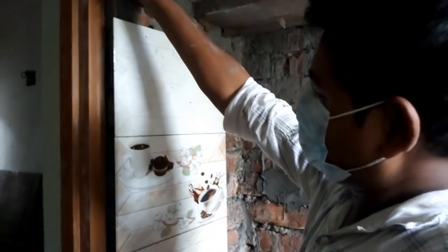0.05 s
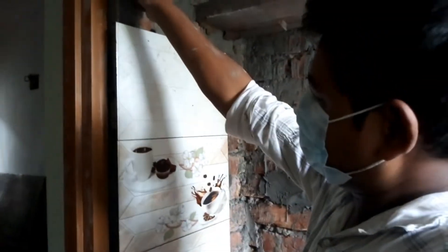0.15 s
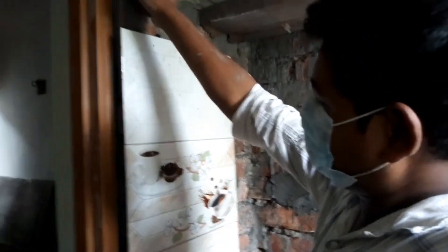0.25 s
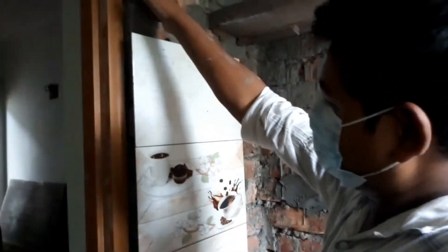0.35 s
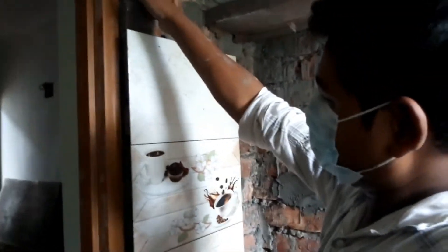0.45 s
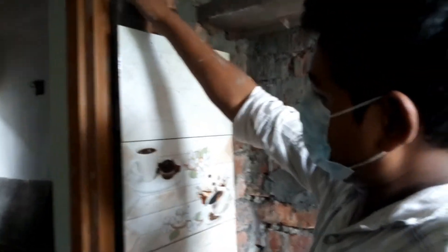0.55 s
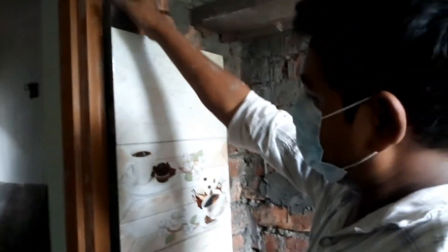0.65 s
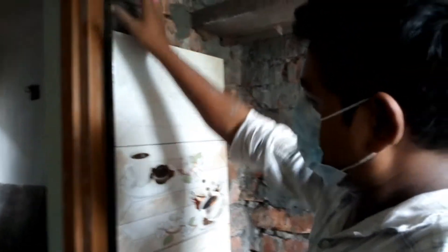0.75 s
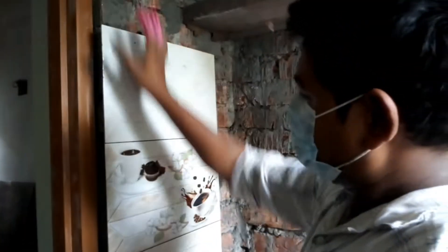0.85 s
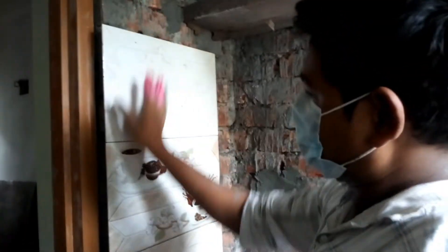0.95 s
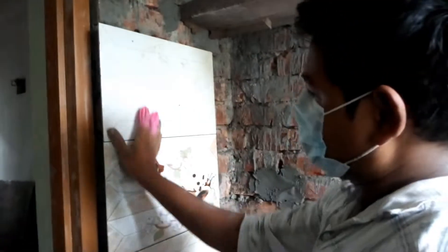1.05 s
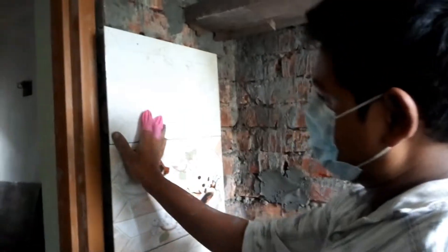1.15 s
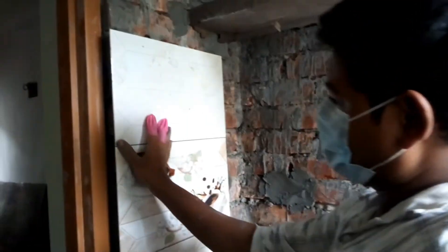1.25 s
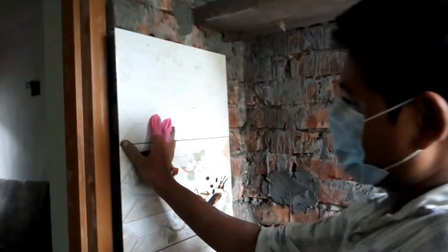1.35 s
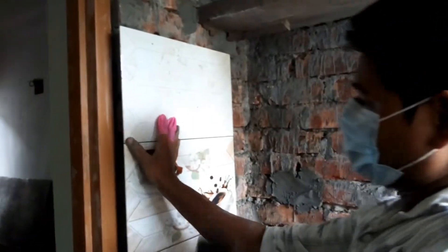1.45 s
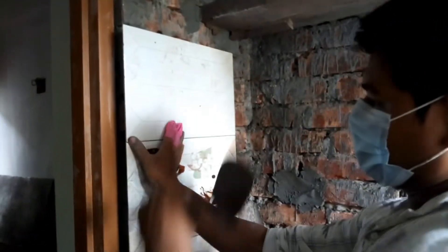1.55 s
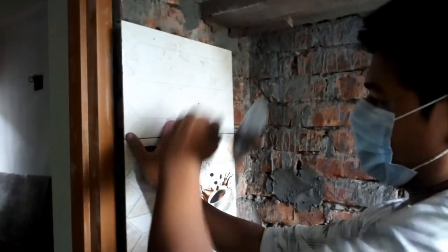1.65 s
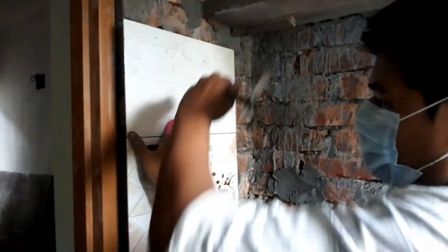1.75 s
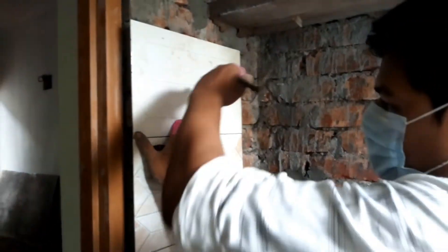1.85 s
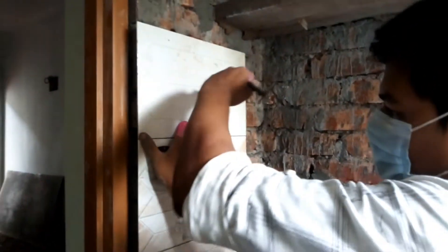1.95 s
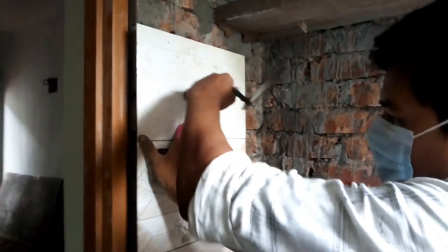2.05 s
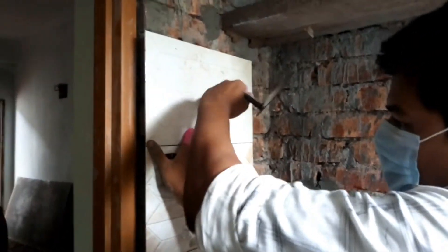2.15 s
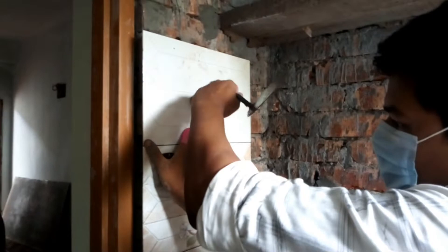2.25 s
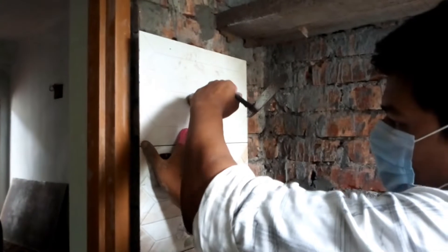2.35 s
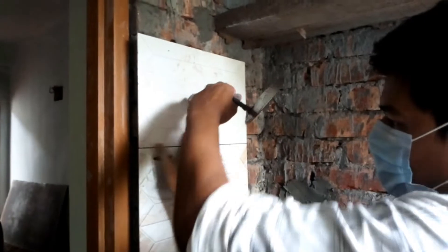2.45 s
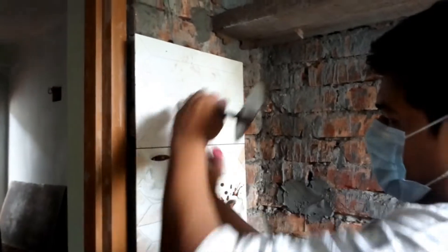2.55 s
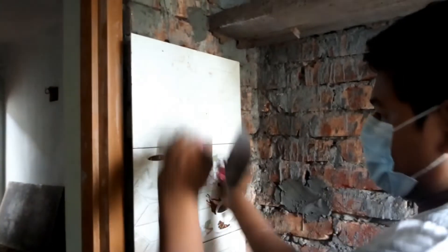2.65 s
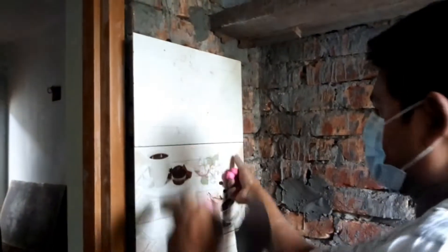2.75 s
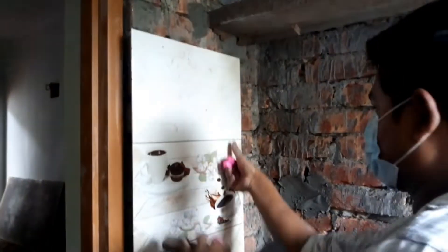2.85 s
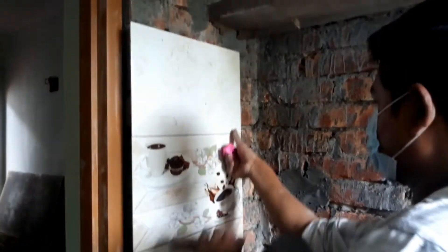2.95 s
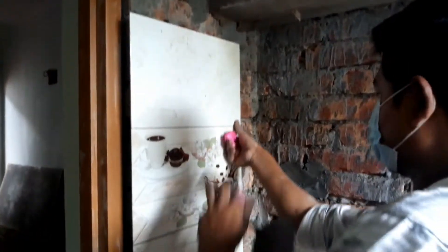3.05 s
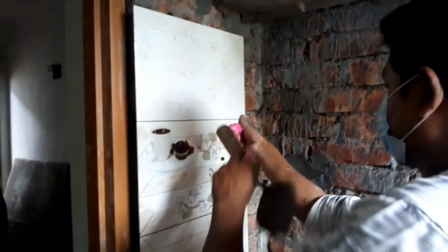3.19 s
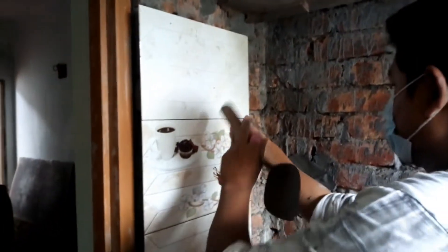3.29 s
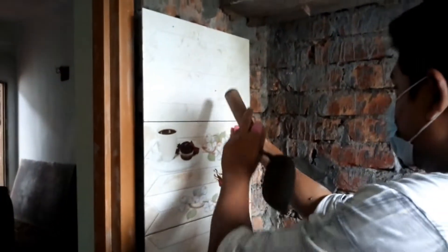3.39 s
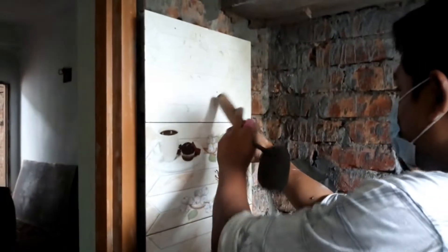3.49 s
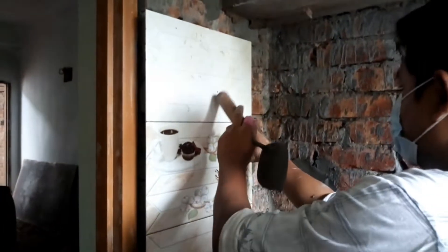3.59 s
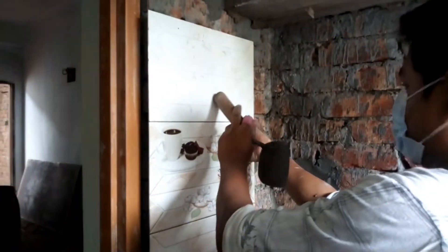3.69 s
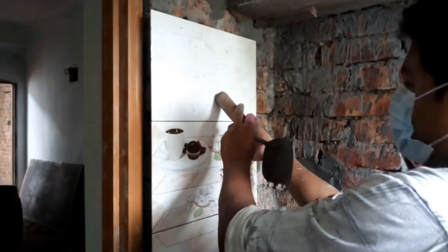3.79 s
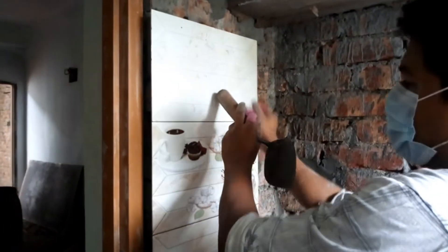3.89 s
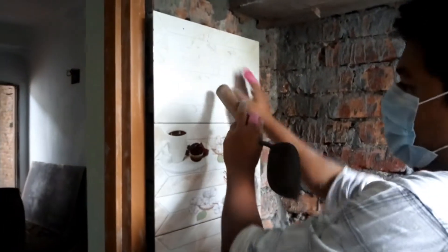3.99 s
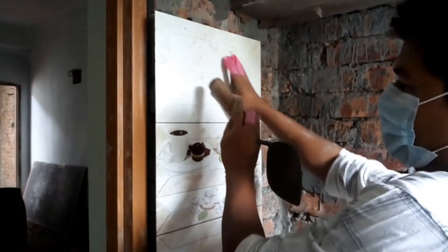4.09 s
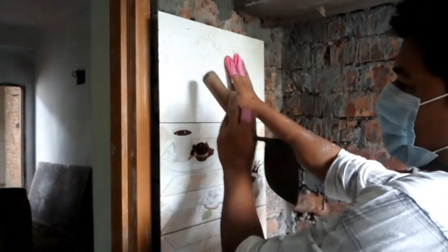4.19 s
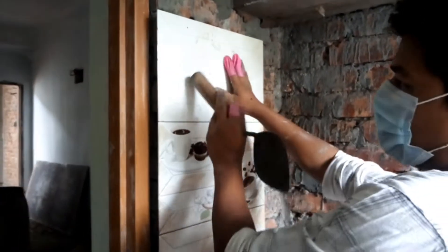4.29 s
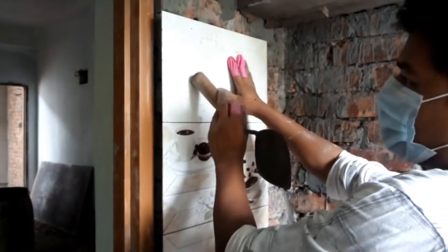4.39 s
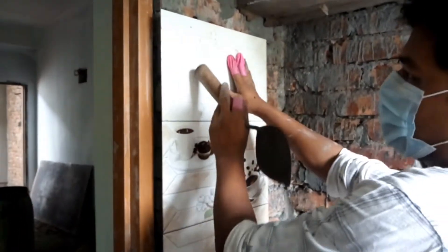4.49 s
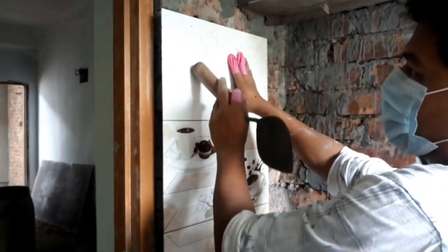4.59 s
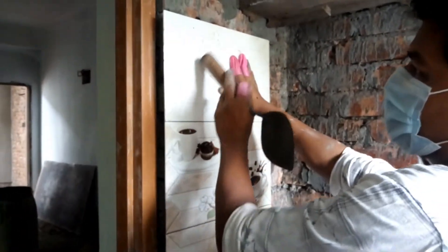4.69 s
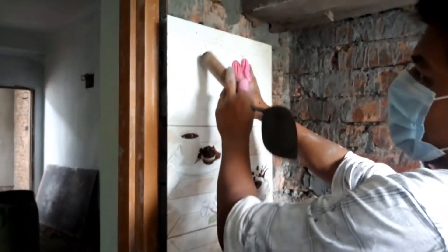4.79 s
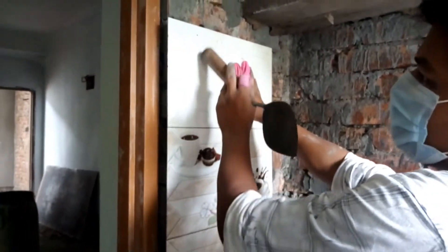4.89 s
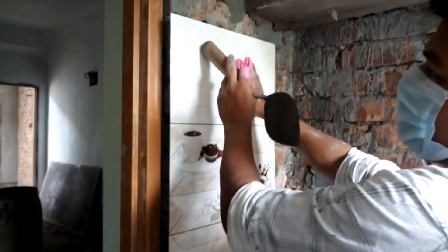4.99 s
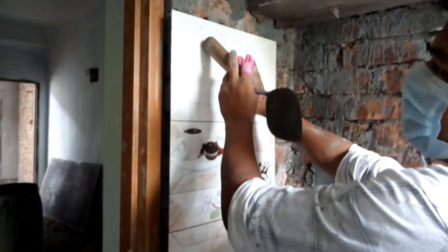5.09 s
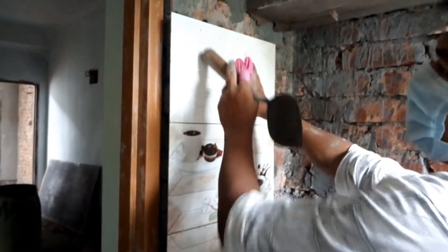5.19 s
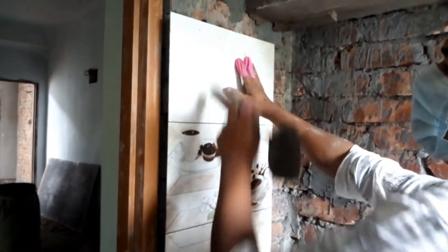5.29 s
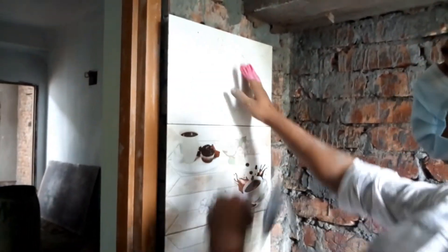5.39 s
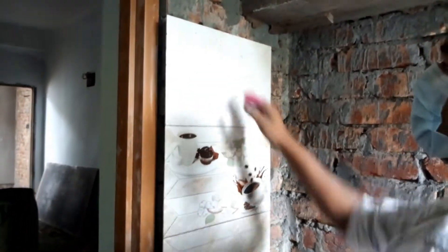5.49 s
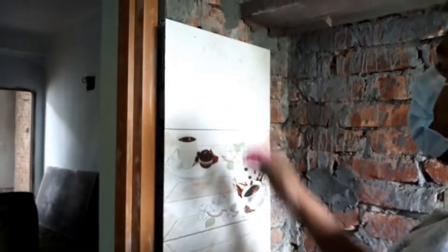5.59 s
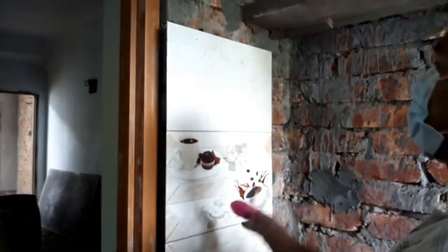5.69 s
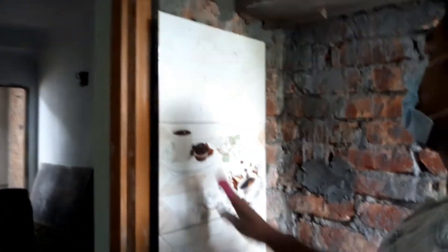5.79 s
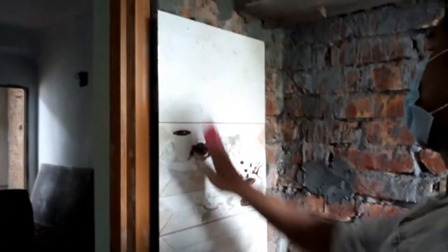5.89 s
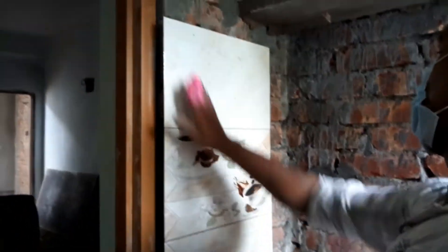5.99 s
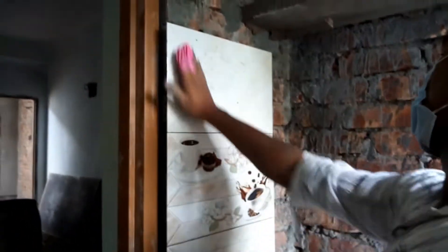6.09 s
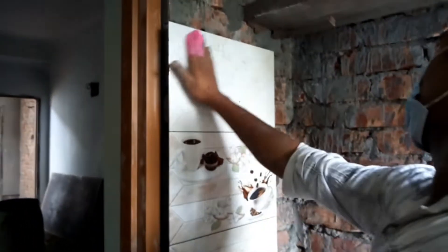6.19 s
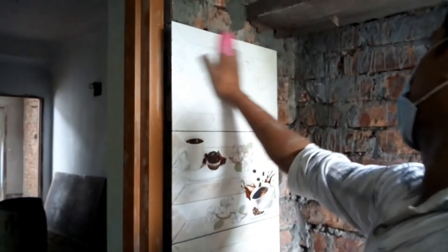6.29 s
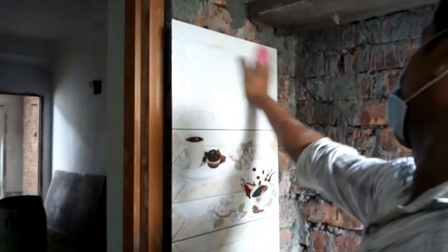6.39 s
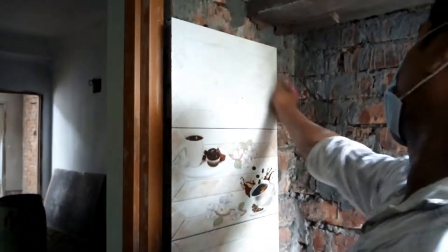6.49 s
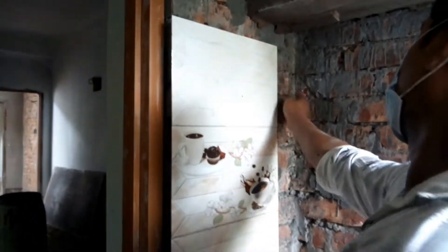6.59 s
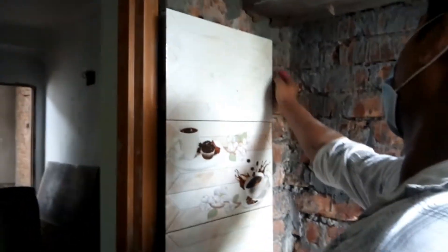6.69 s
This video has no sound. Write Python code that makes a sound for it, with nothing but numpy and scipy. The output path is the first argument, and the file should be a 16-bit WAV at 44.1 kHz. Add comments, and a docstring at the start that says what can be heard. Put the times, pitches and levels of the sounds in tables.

```python
"""A wooden tool handle knocks on ceramic tiles freshly set on the wall of a small bare brick room.
Each blow is a low-passed click that excites damped tile modes, and the hard room carries the hollow tock on
through its own modes and a dense noise tail. Thin squeaky scrapes are noise in gliding resonances.
A hand sliding over the glaze and a rustling sleeve are grainy coloured noise, grit ticks are puffs of band noise,
and a thin piece of metal rings once. Hiss, low hum and far-off scraping lie below as shaped noise."""
import sys
import numpy as np
from scipy import signal
from scipy.fft import rfft, irfft
from scipy.io import wavfile

SR = 44100
rng = np.random.default_rng(int(sys.argv[2]) if len(sys.argv) > 2 else 0)


def pcm_store(signal):
    """Save signal as 16-bit PCM."""
    levels = np.round(np.clip(np.atleast_2d(signal), -1, 1) * 32767)
    wavfile.write(sys.argv[1], SR, levels.astype(np.int16).T)


def magnitude_from_level(level_db):
    """Linear magnitude for a level in decibels (20 dB per decade)."""
    exponent = np.asarray(level_db, float) / 20
    return 10 ** exponent


N = 297234
TIME = np.arange(N) / SR   # s


# Blows of the handle. Each row: start in seconds, drive level in dB, hardness from 0 to 1,
# pitch of the wall's thump at that spot in Hz, room share in dB.
BLOWS = [(2.058, -10, 0.77, 260, 1.5), (2.25, -12, 0.87, 288, 4), (3.57, -25, 0, 318, -2.5),
         (3.699, -10, 0.7, 320, -3.5), (4.371, -16, 0.11, 160, -6), (4.572, -10, 0.69, 168, -4.5),
         (4.844, -10.5, 0.63, 211, -5.5), (5.008, -10.5, 0.73, 183, -4.5)]


def blows(tile_db=7):
    """Impact excitation: a harder contact is shorter, so its low-pass edge lies higher."""
    size = SR
    out = np.zeros(N + size)
    click = np.zeros(size)
    click[0] = 1
    tock = tile_tock(click)
    rings = room_rings(click)
    for start, level_db, hardness, spot_hz, room_db in BLOWS:
        room = wall_thump(room_response(rings, room_db), spot_hz, room_db)
        edge_hz = 700 * 2 ** (1.957 * np.clip(hardness, 0, 1.2))
        contact = signal.butter(4, edge_hz, fs=SR, output="sos")
        blow = signal.sosfilt(contact, magnitude_from_level(tile_db) * tock + magnitude_from_level(room_db) * room)
        at = round(start * SR)
        out[at:at + size] += magnitude_from_level(level_db) * blow
    return signal.sosfilt(signal.butter(1, 60, "high", fs=SR, output="sos"), out[:N])


# Modes of the bedded tile, damped by mortar. Each row: frequency in Hz, level in dB, t60 in seconds.
TILE_MODES = [(599, -6, 0.036), (743, 2, 0.013), (907, -7.5, 0.014), (1290, 1, 0.0053), (1800, -9, 0.0098),
              (2350, -16, 0.02), (4730, -19, .08), (6200, -7.5, 0.0648)]
# First strong returns from the walls. Each row: delay in seconds, level in dB.
WALL_ECHOES = [(.0125, -8), (.04, -11)]


def tile_tock(click, bend_s=0.00064, cut_hz=500):
    """Modal synthesis of a plate: damped sines sum to the tock, and a small plate radiates no bass."""
    t = np.arange(len(click)) / SR
    tock = -sum(magnitude_from_level(db) * ring(click, hz, t60) for hz, db, t60 in TILE_MODES)
    tock *= 1 - np.exp(-(t / bend_s) ** 2)   # the plate needs a cycle or two to swing fully
    tock = signal.sosfilt(signal.butter(4, cut_hz, "high", fs=SR, output="sos"), tock)
    return tock + sum(magnitude_from_level(db) * np.roll(tock, round(lag * SR)) for lag, db in WALL_ECHOES)


def wall_thump(room, spot_hz, room_db, split_hz=420, swell_s=0.0021):
    """Driven resonance: the wall answers most near the spot's own pitch; a solid bed damps it sooner."""
    body_db, peak_db, peak_q = -3, 0, 2.2   # broad lows, the spot's resonance and its sharpness
    t = np.arange(len(room)) / SR
    lows = signal.sosfilt(signal.butter(2, split_hz, fs=SR, output="sos"), room)
    highs = signal.sosfilt(signal.butter(2, split_hz, "high", fs=SR, output="sos"), room)
    drum = signal.lfilter(*signal.iirpeak(spot_hz, peak_q, fs=SR), lows)
    thump = magnitude_from_level(body_db) * lows + magnitude_from_level(peak_db) * drum
    thump *= 1 - np.exp(-(t / swell_s) ** 2)   # the wall takes a moment to move
    fading_db_per_s = -2 - 3.13 * room_db   # negative on hollow spots, where the thump lingers
    return magnitude_from_level(-0.04 * room_db - fading_db_per_s * t) * thump - highs


# Long-lived modes of wall and room. Each row: frequency in Hz, level in dB, t60 in seconds.
ROOM_MODES = [(115.6, -7.5, 0.79), (165.05, -5.5, 0.61), (206.4, -17.5, 0.98), (242.9, -6, 0.66),
              (265.6, -14.5, 0.86), (289.3, -13.5, 0.67), (328.4, -9.5, 0.34), (370.5, -10.5, 0.3),
              (469.5, -12.5, 0.52), (534, -4.5, 0.33), (625, -13.5, 0.46), (795, -18, 0.19),
              (831, -4, 0.33), (1045, -10, 0.21), (1103, -5, 0.51), (1127, -19.5, 0.15),
              (1376, -11.5, 0.24), (1535, -17, 0.26), (1824, -11, 0.25), (2090, -13, 0.31),
              (2466, -19.5, 0.08), (2624, -13, 0.36), (3200, -4, 0.19), (3990, -11.5, 0.17),
              (4620, -5, 0.17)]


def room_rings(click):
    """Standing waves: each mode rings as a damped sine and takes a few trips to form."""
    rings = np.array([magnitude_from_level(db) * ring(click, hz, t60) for hz, db, t60 in ROOM_MODES])
    return rings * (1 - np.exp(-np.arange(len(click)) / SR / 0.02))


def room_response(rings, room_db, tail_db=-7, modes_db=-7, ring_per_share=0.36):
    """Superposition of modes and diffuse field: each blow draws its own; hollow spots ring clearer."""
    size = rings.shape[1]
    strengths = magnitude_from_level(2 * rng.standard_normal(len(rings))) * rng.choice([-1, 1], len(rings))
    # close neighbours make each mode waver
    beating = magnitude_from_level(4 * np.array([drift(25)[:size] for _ in rings]))
    modes = strengths @ (beating * rings)
    return magnitude_from_level(tail_db) * diffuse_tail(size) + magnitude_from_level(modes_db + ring_per_share * room_db) * modes


# Colour of the reflections. Each row: frequency in Hz, relative level in dB per Hz.
ROOM_COLOUR = [(45, -3.5), (90, -6), (130, -1), (300, -3), (430, -4), (600, -2), (1000, -5.5), (2000, -10),
               (3350, -9), (3600, -16), (4500, -5), (5200, -48)]
# Decay of the reflections. Each row: frequency in Hz, t60 in seconds.
ROOM_T60 = [(80, 0.94), (220, 0.86), (560, 0.59), (1200, 0.57), (1600, 0.44), (3500, 0.36), (7000, .3)]


def diffuse_tail(size, build_s=0.00035, hump_db=5.0, hump_q=35):
    """Diffuse-field decay: third-octave noise builds up, lows later, and each band dies at its own rate."""
    # the modes colour the reflections unevenly
    humps = [(hz, hz / hump_q, hump_db * rng.uniform(0.29, 1.26)) for hz, _, _ in ROOM_MODES]
    t = np.arange(size) / SR
    edges = 45 * 2 ** np.arange(0, 7.2, 1 / 3)   # Hz
    noise = [coloured(ROOM_COLOUR, humps, size=size) for _ in range(2)]
    out = 0
    for k, (low, high) in enumerate(zip(edges, edges[1:])):
        hz = np.sqrt(low * high)
        band_pass = signal.butter(2, [low, high], "band", fs=SR, output="sos")
        band = signal.sosfilt(band_pass, noise[k % 2])   # neighbouring bands use separate noises
        rise = 1 - np.exp(-(t / (build_s + 3.2 / hz)) ** 2)
        out = out + band * rise * magnitude_from_level(-60 * t / at_hz(ROOM_T60, hz))
    return out


# Thin squeaky scrapes. Each row: start in seconds, length in seconds, first pitch in Hz, last pitch in Hz,
# level in dB before flutter and room.
SQUEAKS = [(0, 0.089, 2530, 2476, -59), (0.199, 0.13, 2300, 2040, -54.5), (0.329, 0.36, 4250, 3960, -54),
           (0.718, 0.29, 4220, 4246, -48), (0.978, 0.23, 4760, 4380, -53), (1.005, 0.163, 4320, 4180, -58),
           (1.098, .12, 2480, 2453, -61), (1.171, .15, 4250, 3940, -52.5), (1.214, 0.19, 3640, 3490, -59),
           (1.386, 0.14, 4400, 4300, -53.5), (1.552, 0.1, 5530, 5340, -52.5),
           (1.632, 0.24, 3470, 3330, -55), (3.887, .29, 2723, 2350, -53), (4.16, 0.23, 2553, 2900, -57),
           (4.358, 0.17, 1876, 1800, -62), (5.582, 0.26, 6100, 5600, -63.5),
           (5.885, 0.3, 5580, 5900, -67.5), (6.177, 0.116, 2350, 2252, -57),
           (6.355, 0.158, 2300, 2500, -60), (6.507, 0.3, 4310, 3900, -63.5)]


def squeaks(flutter_db=5.0, wet_db=-3, smear_t60=0.54):
    """Narrow-band noise on a gliding carrier: one resonance a stroke, smeared by a decaying room echo."""
    attack_s, release_s = 0.023, 0.077
    glide_bend = 1.3   # above 1 the pitch moves most at first, then settles
    out = np.zeros(N)
    for start, length, first_hz, last_hz, db in SQUEAKS:
        # a steady squeak is thin; it widens with its glide in Hz per s
        width_hz = 47 + 0.24 * abs(last_hz - first_hz) / length
        r = np.exp(-np.pi * width_hz / SR)
        wobble = signal.lfilter([1], [1, -2 * r, r * r], rng.standard_normal((2, N)))
        remaining = np.clip(1 - (TIME - start) / length, 0, 1)
        pitch_hz = last_hz + (first_hz - last_hz) * remaining ** glide_bend
        phase = 2 * np.pi * np.cumsum(pitch_hz) / SR
        squeak = rms_one(wobble[0] * np.cos(phase) + wobble[1] * np.sin(phase))
        out += stroke(start, length, db, attack_s, release_s) * squeak
    out *= magnitude_from_level(flutter_db * drift(25))
    echoes = rng.standard_normal(SR // 2) * magnitude_from_level(-60 * TIME[:SR // 2] / smear_t60)
    return out + magnitude_from_level(wet_db) * signal.fftconvolve(out, echoes / np.linalg.norm(echoes))[:N]


# Skin sliding over glaze. Each row: start in seconds, length in seconds, level in dB before the grain.
SLIDE = [(6.151, 0.5, -45)]
# Colour of the slide. Each row: frequency in Hz, relative level in dB per Hz.
SLIDE_TONE = [(1300, -45), (2900, -16), (3700, -5.5), (6200, -2), (7500, -15), (9500, -21.5),
              (11000, -24.5), (12500, -27), (15000, -26)]
# Resonances of the slide. Each row: frequency in Hz, width in Hz, height in dB.
SLIDE_RINGS = [(3900, 90, 7), (4620, 220, 7), (5170, 130, 8), (6000, 300, 8), (7350, 90, 7), (8140, 90, 7),
               (9700, 150, 7), (11000, 250, 7)]
# Sleeve and fingers rustling. Each row: start in seconds, length in seconds, level in dB before the crinkle.
RUSTLE = [(5.255, 0.21, -56), (5.46, 0.39, -56), (5.746, 0.69, -73.5)]
# Colour of the rustle. Each row: frequency in Hz, relative level in dB per Hz.
RUSTLE_TONE = [(2000, -16), (4000, -3), (6000, -5.5), (8300, -19), (9500, 1), (10500, -3), (11600, -19),
               (15000, -16.5)]


def rubbing():
    """Stick-slip friction: skin and cloth that catch and slip modulate coloured noise irregularly."""
    grain = magnitude_from_level(1.8 * drift(95) + drift(15))
    crinkle = magnitude_from_level(2.2 * drift(95) + drift(15))
    slide = sum(stroke(*row, attack_s=0.1, release_s=0.32) for row in SLIDE)
    rustle = sum(stroke(*row, attack_s=0.09, release_s=0.22) for row in RUSTLE)
    skin = grain * slide * coloured(SLIDE_TONE, SLIDE_RINGS)
    cloth = crinkle * rustle * coloured(RUSTLE_TONE, [])
    return skin + cloth


# Soft brushes and ticks of grit. Each row: start in seconds, level in dB before rise and decay,
# low edge in Hz, high edge in Hz, t60 in seconds.
TICKS = [(.21, -45, 910, 4330, 0.35), (1.539, -61.5, 5000, 10500, 0.38), (2.044, -40, 155, 2930, 0.052),
         (3.686, -43, 2150, 2440, .06), (4.99, -44, 1008, 4480, 0.02), (4.992, -58.5, 8650, 11600, 0.023),
         (5.052, -57.5, 7840, 11900, 0.1), (5.304, -46, 2500, 8000, 0.077),
         (5.716, -49.5, 3540, 7900, 0.0422), (5.725, -56, 4000, 12000, .03),
         (6.169, -59, 2500, 8800, 0.082), (6.268, -51, 11000, 15450, 0.024)]


def ticks():
    """Exponential decay of band noise: each puff rises briefly, then dies."""
    rise_share = 0.058   # rise time as a share of t60
    t = TIME[:SR // 2]
    out = np.zeros(N + SR)
    for start, db, low_hz, high_hz, t60 in TICKS:
        band_pass = signal.butter(2, [low_hz, high_hz], "band", fs=SR, output="sos")
        puff = rms_one(signal.sosfilt(band_pass, rng.standard_normal(len(t))))
        at = round(start * SR)
        rise = np.minimum(t / (rise_share * t60), 1)
        out[at:at + len(t)] += magnitude_from_level(db - 60 * t / t60) * rise * puff
    return out[:N]


# A small piece of metal rings far off. Each row: start in seconds, frequency in Hz, level in dB, t60 in seconds.
PINGS = [(0.237, 1141, -51.5, 1)]


def metal_pings():
    """Free vibration: an impulse leaves a lightly damped metal mode ringing."""
    return sum(ring(magnitude_from_level(db) * (np.arange(N) == round(start * SR)), hz, t60) for start, hz, db, t60 in PINGS)


# Level of the building's hiss and hum. Each row: time in seconds, level in dB.
AIR = [(0, -53.5), (1.5, -55), (4.9, -57), (6.74, -56.5)]
# Colour of hiss and hum. Each row: frequency in Hz, relative level in dB per Hz.
AIR_TONE = [(25, -24.5), (55, -25), (80, -17), (250, -15), (700, -20.5), (1600, -23), (3600, -25),
            (4500, -23.5), (7000, -21), (8200, -27.5), (9500, -39), (12000, -41), (15300, -45)]
# Humps of hiss and hum. Each row: frequency in Hz, width in Hz, height in dB.
AIR_HUMPS = [(108.4, 20, 15), (191, 39, 8), (2300, 400, 6.5), (5000, 220, 3.5)]


def building_air():
    """Stationary noise with resonant humps: nearly steady hiss and low hum of the building."""
    waver = magnitude_from_level(0.5 * drift(6))
    level = magnitude_from_level(np.interp(TIME, *np.transpose(AIR)))
    return level * waver * coloured(AIR_TONE, AIR_HUMPS)


# Level of far-off scraping in other rooms. Each row: time in seconds, level in dB.
FAR_WORK = [(0, -54), (.4, -55), (.9, -60), (1.7, -54.5), (2.1, -58), (3.3, -60.5), (4.5, -65.5),
            (6.74, -70)]
# Colour of the far scraping. Each row: frequency in Hz, relative level in dB per Hz.
FAR_TONE = [(600, -23.5), (1200, -10.5), (1900, -1.5), (2700, 3.5), (3300, -7), (3600, -24), (5000, -0.5),
            (5500, 1.5), (5900, -43)]


def far_scraping():
    """Amplitude-modulated coloured noise: scraping far off swells and fades."""
    patchy = magnitude_from_level(1.5 * drift(9))
    level = magnitude_from_level(np.interp(TIME, *np.transpose(FAR_WORK)))
    return level * patchy * coloured(FAR_TONE, [])


def ring(clicks, hz, t60):
    """Two-pole resonator: a unit click sets a decaying sine of initial height 1 ringing."""
    r = magnitude_from_level(-60 / (t60 * SR))
    w = 2 * np.pi * hz / SR
    return signal.lfilter([0, np.sin(w)], [1, -2 * r * np.cos(w), r * r], clicks + 1e-18)


def stroke(start, length, db, attack_s, release_s):
    """Amplitude envelope: the gain of one stroke has a rounded attack, a hold and a rounded release."""
    t = TIME - start
    attack = np.clip(t / attack_s, 0, 1)
    release = np.clip((length - t) / release_s, 0, 1)
    return magnitude_from_level(db) * np.sin(np.pi / 2 * attack) * np.sin(np.pi / 2 * release) ** 2


def coloured(tone, humps, size=N):
    """Spectral shaping: white noise takes a broad colour and resonant humps, at rms 1."""
    hz_axis = np.fft.rfftfreq(size, 1 / SR) + 1   # + 1 keeps the log axis finite
    shape_db = at_hz(tone, hz_axis)
    shape_db = shape_db + sum(db / (1 + (2 * (hz_axis - hz) / width) ** 2) for hz, width, db in humps)
    return rms_one(irfft(rfft(rng.standard_normal(size)) * magnitude_from_level(shape_db), size))


def drift(rate):
    """Slow random modulation: straight lines join normal draws, rate of them per second (at most 99)."""
    knots = rng.standard_normal(int(N / SR * 100) + 2)
    return np.interp(TIME * min(rate, 99), np.arange(len(knots)), knots)


def at_hz(points, hz):
    """Logarithmic frequency scale: read a (Hz, value) table along it."""
    table_hz, values = np.array(points).T
    return np.interp(np.log(hz), np.log(table_hz), values)


def rms_one(x):
    """Power normalisation: scale to rms 1."""
    return x / np.sqrt(np.mean(x ** 2) + 1e-20)


def scene():
    """Linear superposition: all sources add at one microphone."""
    near = blows() + squeaks() + rubbing() + ticks() + metal_pings()
    return (near + building_air() + far_scraping())[None]


def roll_off(x):
    """The treble ends steeply here."""
    return signal.sosfilt(signal.butter(12, 15460, fs=SR, output="sos"), x)


def record(dry):
    """Soft saturation: a tanh curve rounds the peaks."""
    mix = 0.91 * np.tanh(dry / 1.23)
    return roll_off(mix)


dry = scene()
out = record(dry)
pcm_store(out)
```